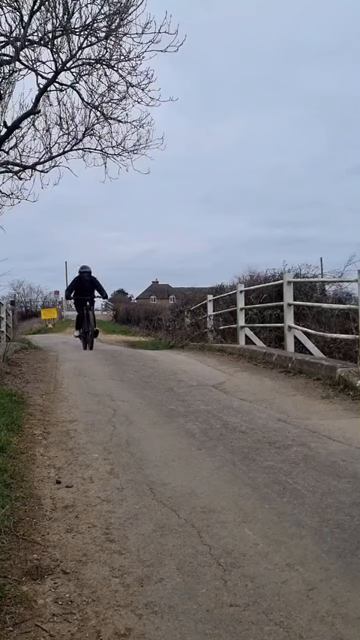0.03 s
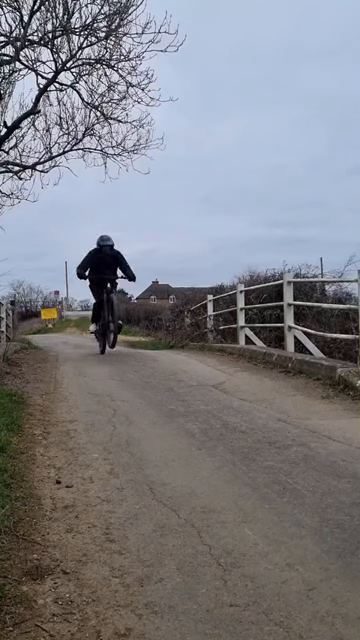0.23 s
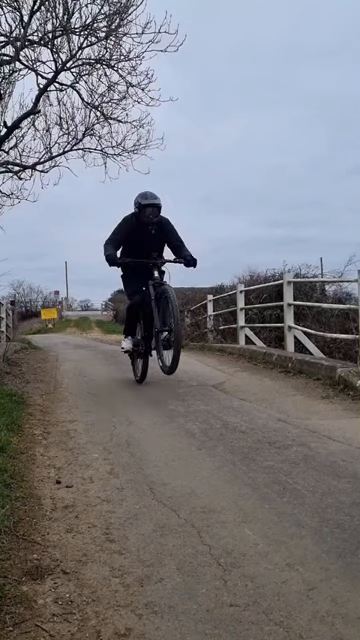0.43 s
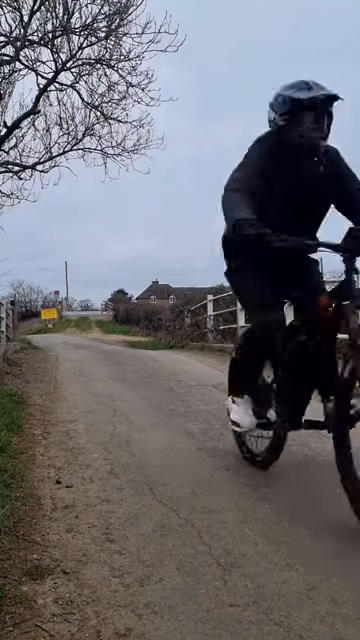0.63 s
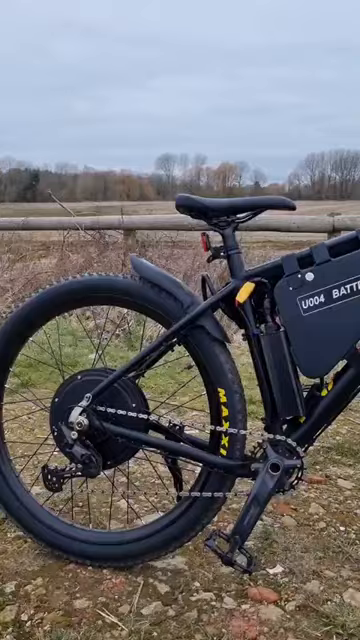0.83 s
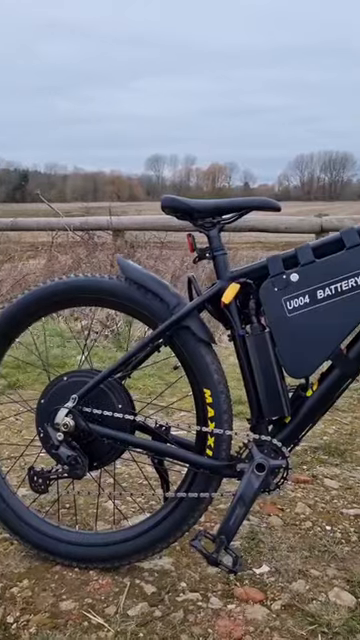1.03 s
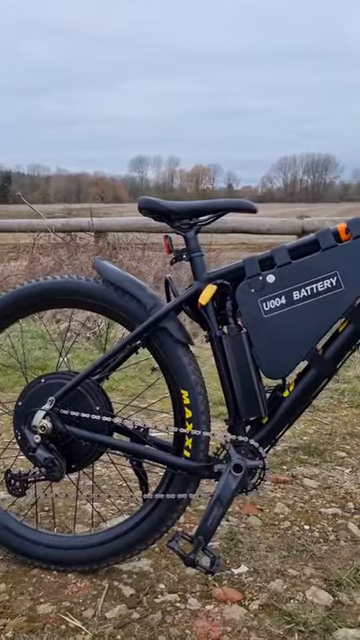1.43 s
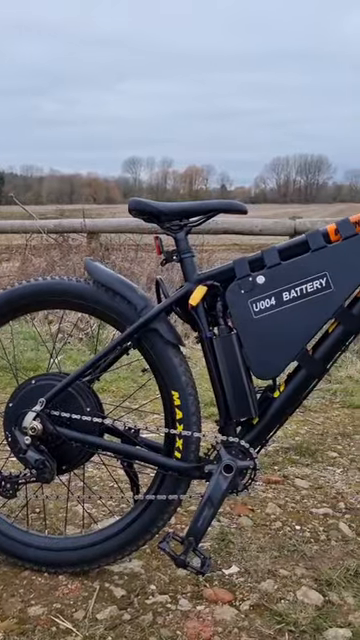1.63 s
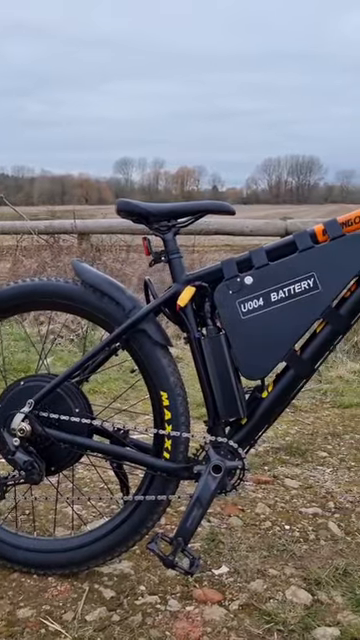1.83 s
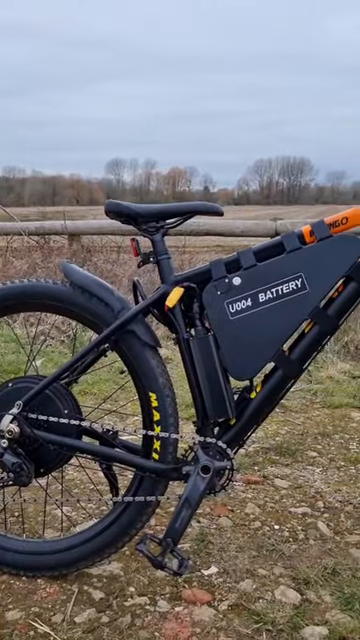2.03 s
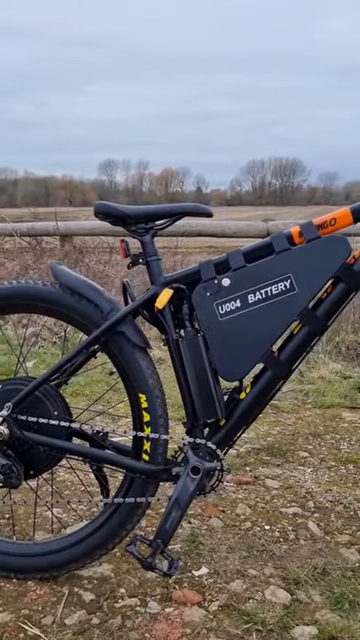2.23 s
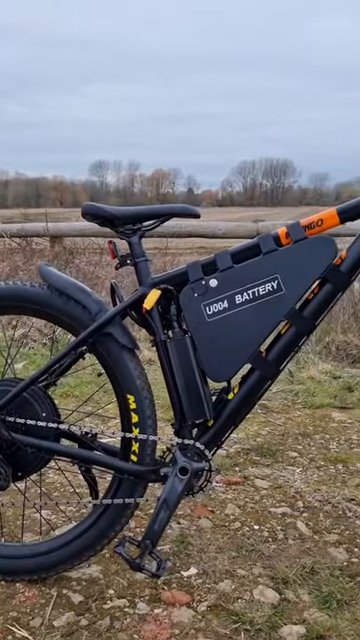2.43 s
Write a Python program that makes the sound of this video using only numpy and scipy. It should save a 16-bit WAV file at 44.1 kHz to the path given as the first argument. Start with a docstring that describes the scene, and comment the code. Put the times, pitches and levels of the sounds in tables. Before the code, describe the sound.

An electric bike's tyre rush and rough motor whine swell quickly outdoors, with two small knocks and wind on the microphone. The sound stops abruptly close by, and a low, steady hum continues on the left over faint outdoor air.

```python
"""Electric bike on a country lane

An electric bike rides up and draws level on the right. Its tyres rush and crackle on gritty asphalt
(broadband noise and random impulses), its hub motor whines roughly (a randomly modulated tone), and air
buffets the microphone ports. The ride is cut off short; a quiet field follows, with a low steady hum
on the left."""
import sys
import numpy as np
from scipy.fft import rfft, irfft, next_fast_len
from scipy.io import wavfile
from scipy.ndimage import map_coordinates

SR = 44100
rng = np.random.default_rng(int(sys.argv[2]) if len(sys.argv) > 2 else 0)


def output_pcm(signal):
    """Save a mono or channel-first signal as 16-bit PCM at the path in sys.argv[1].

    Samples are clipped to [-1, 1] before scaling.
    """
    pcm = np.clip(np.atleast_2d(signal).T, -1, 1) * 32767
    wavfile.write(sys.argv[1], SR, np.round(pcm).astype(np.int16))


N = 110250
TIME = np.arange(N) / SR


def amp(db):
    """Amplitude ratio: a factor of ten for every 20 dB."""
    return 10 ** (np.asarray(db) / 20)


def unit(x):
    """Normalisation to rms 1."""
    return x / np.sqrt(np.mean(x ** 2) + 1e-20)


def curve(rows):
    """Linear interpolation of (t/s, value) rows at every sample."""
    return np.interp(TIME, *np.transpose(rows))


def wobble(knots_per_s):
    """Smooth random modulation: a spline through Gaussian values."""
    return map_coordinates(rng.standard_normal(N // 20), [TIME * knots_per_s], mode="wrap")


def filtered(x, response):
    """Linear filtering: the spectrum of x times a frequency response."""
    size = next_fast_len(N + SR // 2)
    return irfft(rfft(x, size) * response(np.fft.rfftfreq(size, 1 / SR)), size)[..., :N]


def shaped(x, spectrum):
    """Spectral shaping by (f/Hz, gain/dB) rows, interpolated in log frequency."""
    f, db = np.transpose(spectrum)
    return filtered(x, lambda hz: amp(np.interp(np.log(hz + 1), np.log(f + 1), db)))


def noise(spectrum):
    """Coloured noise: white noise shaped to a spectrum, at rms 1."""
    return unit(shaped(rng.standard_normal(N), spectrum))


def resonant(modes):
    """Forced resonance: noise drives (f/Hz, bandwidth/Hz, gain/dB) modes; the sum has rms 1."""
    def response(f):
        return sum(amp(db) * 1j * f * width / (f0 ** 2 - f ** 2 + 1j * f * width)
                   for f0, width, db in modes)
    return unit(filtered(rng.standard_normal(N), response))


def bearing(speed_m_per_s=12, abreast_s=.9, offset_m=1.05):
    """Sine of the bike's azimuth in uniform straight motion: near 0 far away, 1 abreast."""
    return offset_m / np.hypot(offset_m, speed_m_per_s * (abreast_s - TIME))


# Envelopes of the tread roar and the treble hiss: t/s, relative level/dB
ROAR_LEVEL = [(0.0, -51), (0.012, -48), (0.24, -43.5), (0.256, -47.5), (0.346, -40.5), (0.39, -47.5),
              (0.412, -33), (0.454, -41.5), (0.53, -34), (0.556, -42.5), (0.604, -31), (0.642, -38.5),
              (0.654, -33.5), (0.718, -33.5), (0.728, -27.5), (0.818, -27.5), (0.895, -27.5)]
HISS_LEVEL = [(0.0, -81), (0.008, -100), (0.388, -63), (0.408, -57.5), (0.45, -60.5), (0.738, -51),
              (0.748, -46.5), (0.82, -52), (0.895, -43.5)]
# Their spectra: f/Hz, relative spectral density/dB
ROAR_SPECTRUM = [(30, -19), (120, -7), (240, -4.5), (340, 2.5), (430, -1.5), (540, 2.5), (700, 5), (900, 2),
                 (1100, 0), (1400, 1), (2000, -1), (2600, -4), (3250, -0.5), (3900, -8.5), (4900, -10.5),
                 (6000, -21), (7200, -21), (8200, -46.5), (15000, -47.5)]
HISS_SPECTRUM = [(1000, -31.5), (4000, -3.5), (7000, -0.5), (8300, -2), (10500, -1), (12800, 7), (15500, 3)]
def tyres(grits_per_s=900, grit_spread_db=3.5, grit_db=-9.5, near_db=2.5):
    """Rolling noise: tread roar, grit snapping as a Poisson process, hiss from close by, and strikes."""
    impulses = (rng.random(N) < grits_per_s / SR) * rng.choice([-1, 1], N)
    strength = amp(grit_spread_db * np.minimum(rng.exponential(size=N), np.pi))
    grit = amp(grit_db) * unit(shaped(impulses * strength, ROAR_SPECTRUM))
    roar = amp(curve(ROAR_LEVEL) + .89 + near_db * bearing()) * (noise(ROAR_SPECTRUM) + grit)
    hiss = amp(curve(HISS_LEVEL) - .5) * noise(HISS_SPECTRUM)
    return roar + hiss + strikes()


# Envelope of the whine: t/s, relative level/dB
WHINE_LEVEL = [(0, -46), (.13, -40.5), (.23, -35), (.27, -39.5), (.345, -28), (.365, -43.5), (.43, -35.5),
               (.47, -40), (.53, -31.5), (.56, -45), (.64, -33), (.695, -34.5), (.715, -24), (.755, -37),
               (.79, -22.5), (.84, -33), (.88, -20), (.9, -32)]
# Its fundamental: t/s, f/Hz
WHINE_PITCH = [(0, 750), (.34, 758), (.6, 768), (.68, 785), (.73, 720), (.79, 795), (.9, 780)]
# Modes of wheel and frame: f/Hz, bandwidth/Hz, gain/dB
FRAME_MODES = [(784, 46, -1.5), (1360, 110, -11)]
def motor(roughness=.99, knots_per_s=95, pitch_waver=.012, octave_db=-21, frame_db=-8.5):
    """Random amplitude and phase modulation roughens the whine; wheel and frame resonate along with it."""
    hz = curve(WHINE_PITCH) * (1 + pitch_waver * wobble(knots_per_s / 2))
    phase = 2 * np.pi * np.cumsum(hz) / SR
    in_phase = (1 + roughness * wobble(knots_per_s)) * np.sin(phase)
    quadrature = roughness * wobble(knots_per_s) * np.cos(phase)
    whine = amp(-.5) * unit(in_phase + quadrature + amp(octave_db) * np.sin(2 * phase))
    return amp(curve(WHINE_LEVEL)) * (whine + amp(frame_db) * resonant(FRAME_MODES))


def wheel_drone(hz=357, bandwidth_hz=28, far_db=-52, near_db=8.5):
    """One narrow resonance of the wheel, growing louder as the bike nears."""
    return amp(far_db + near_db * bearing()) * resonant([(hz, bandwidth_hz, 0)])


# Response of the scattering off verge and fence: f/Hz, gain/dB
SCATTER_RESPONSE = [(100, -5.5), (400, -8.5), (800, -4), (2400, -4), (5000, -4), (9000, 6), (15000, 2.5)]
def bike(port_lag_s=.0002, heading_sine=.04, near_scatter_db=3.5, shade_db=4, balance_db=-1.9):
    """Time and level differences between the ports locate the bike; scattered tyre noise is diffuse."""
    source = tyres() + motor() + wheel_drone()
    half_lag = port_lag_s * SR * (bearing() - heading_sine) / 2  # samples; the right port leads
    direct = np.array([map_coordinates(source, [np.arange(N) + shift], order=5, mode="nearest")
                       for shift in (-half_lag, half_lag)])
    diffuse = shaped(np.array([tyres(), tyres()]), SCATTER_RESPONSE)
    right_over_left_db = shade_db * bearing() + balance_db
    shade = amp(np.outer([-1, 1], right_over_left_db) / 2)
    return shade * (direct + amp(near_scatter_db * bearing()) * diffuse)


# Envelope of the buffeting: t/s, relative level/dB
BUFFET_LEVEL = [(0, -52.5), (.3, -52), (.7, -47.5), (.73, -30.5), (.77, -42), (.83, -33), (.86, -40.5),
                (.89, -30.5)]
# Its spectrum: f/Hz, relative spectral density/dB
BUFFET_SPECTRUM = [(10, -36), (25, -13), (40, -9), (60, -1), (90, -5.5), (150, -11), (300, -39),
                   (1000, -67)]
def buffeting(own_share=.6, pan_db=4):
    """Pressure fluctuations, partly coherent between the ports, peak as the bike's bow wave arrives."""
    common = noise(BUFFET_SPECTRUM)
    own = np.array([noise(BUFFET_SPECTRUM), noise(BUFFET_SPECTRUM)])
    return unit(common + own_share * own) * amp(curve(BUFFET_LEVEL)) * amp([[-pan_db], [pan_db]])


# Tyre strikes: t/s, relative level/dB, T60/s, treble gain/dB
STRIKES = [(0.396, -38.5, 0.23, -0.5), (.723, -26, 0.29, -15)]
# Spectrum of a strike: f/Hz, relative spectral density/dB
STRIKE_SPECTRUM = [(100, -6.5), (300, -4), (560, 4), (750, 2), (1000, 9), (1400, -8), (4000, -5),
                   (7000, -13.5), (9000, -26), (15000, -30)]
def strikes(attack_s=.003, shelf_start_hz=1500, shelf_end_hz=6000):
    """Impact noise: where a tyre meets the road hard, a burst of scrub decays exponentially."""
    out = np.zeros(N)
    for onset, db, t60, treble_db in STRIKES:
        age = np.maximum(TIME - onset, 0)
        envelope = amp(db - 60 * age / t60) * (1 - np.exp(-age / attack_s))
        shelf = [(shelf_start_hz, 0), (shelf_end_hz, treble_db)]
        out += envelope * unit(shaped(noise(STRIKE_SPECTRUM), shelf))
    return out


# Envelope of the hum's third harmonic: t/s, relative level/dB
THIRD_HARMONIC_LEVEL = [(1.15, -76.5), (1.4, -80.5), (1.55, -82), (1.75, -66.5), (1.95, -69), (2.15, -78),
                        (2.3, -75.5), (2.5, -90)]
def hum(hz=74.4, fundamental_db=-40, waver_db=.5):
    """A harmonic tone: a slightly wavering fundamental and a faint third harmonic."""
    phase = 2 * np.pi * hz * TIME
    fundamental = amp(fundamental_db + waver_db * wobble(19)) * np.sin(phase)
    third = amp(curve(THIRD_HARMONIC_LEVEL)) * np.sin(3 * phase)
    return np.sqrt(2) * (fundamental + third)


# Open-air noise on each side, and breeze on the left port: f/Hz, relative spectral density/dB
AMBIENT_LEFT = [(20, -1), (90, 19), (130, 16), (200, 10), (300, 0.5), (480, -4), (700, 0.5), (950, -4),
                (1300, 0), (2100, -6), (3100, -8.5), (3600, -13), (4800, -16), (5350, -6), (5800, -29.5),
                (15000, -34)]
AMBIENT_RIGHT = [(20, 26), (50, 26.5), (90, 10), (150, 1.5), (650, -2), (950, -5.5), (1300, -2.5),
                 (2200, -13.5), (4000, -18), (8000, -26), (15000, -25.5)]
BREEZE_SPECTRUM = [(15, -25), (30, -10.5), (45, -9.5), (62, 7.5), (90, -9), (112, -21.5), (160, -43),
                   (600, -77)]
def field(open_s=1.091, rise_s=.044, hum_right_db=-39.5):
    """Superposition of uncorrelated ambient noise, breeze and hum; all start hushed, then open up."""
    hush = 1 - np.clip((TIME - open_s) / rise_s, 0, 1)
    tone = amp(-22.5 * hush) * hum()
    left = amp(-66.5 - 6 * hush) * noise(AMBIENT_LEFT)
    right = amp(-67 - 6 * hush) * noise(AMBIENT_RIGHT)
    breeze = amp(-51 - hush) * noise(BREEZE_SPECTRUM)
    return np.array([left + tone + breeze, right + amp(hum_right_db) * tone])


def scene(cut_s=.9034, tail_db=-15.5, tail_t60_s=.041, field_start_s=.938):
    """Gating: the ride stops short with a brief exponential tail, then the field fades in."""
    since_cut = np.maximum(TIME - cut_s, 0)
    riding = TIME <= cut_s
    gate = np.where(riding, 1, amp(tail_db - 60 * since_cut / tail_t60_s))
    fade_in = np.clip((TIME - field_start_s) / .01, 0, 1)
    return gate * bike() + riding * buffeting() + fade_in * field()


def record(dry, top_hz=15750, fade_s=.004):
    """Band limiting: a steep low-pass filter follows a very short closing fade."""
    fade_out = np.clip((TIME[-1] - TIME) / fade_s, 0, 1)
    return filtered(dry * fade_out, lambda hz: np.clip((top_hz - hz) / 200, 0, 1))


dry = scene()
out = record(dry)
output_pcm(out)
```